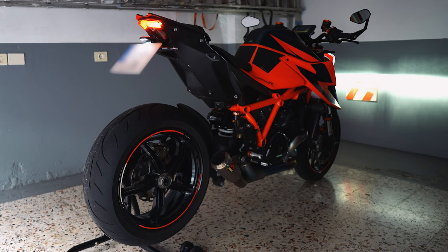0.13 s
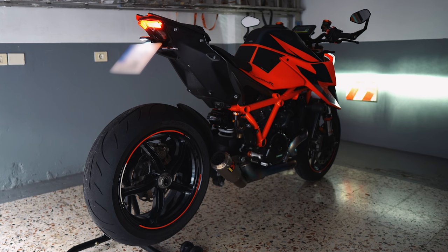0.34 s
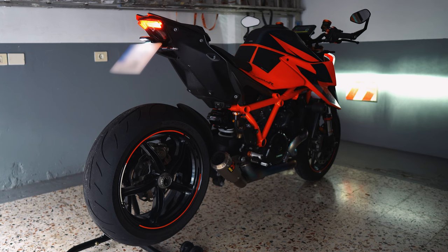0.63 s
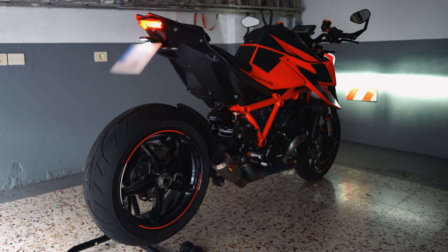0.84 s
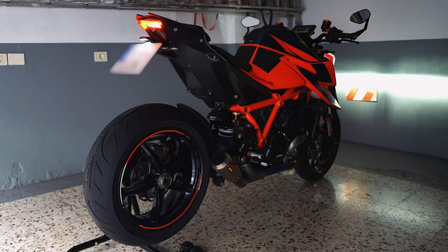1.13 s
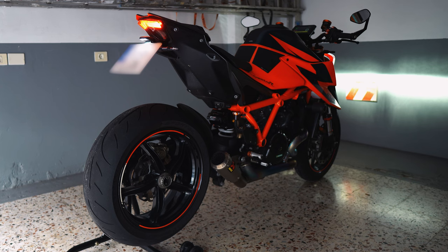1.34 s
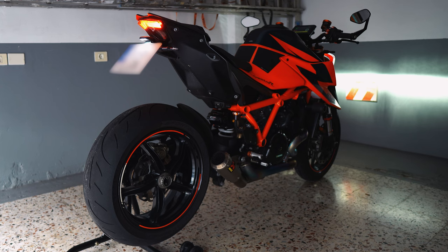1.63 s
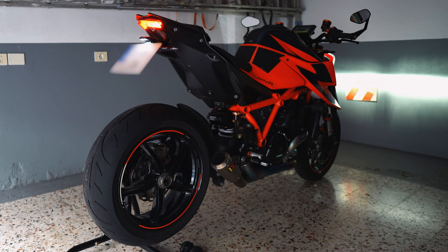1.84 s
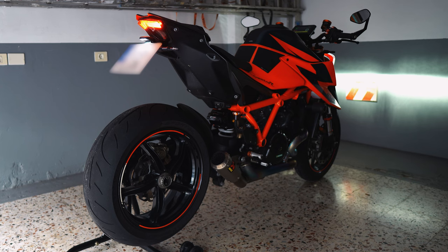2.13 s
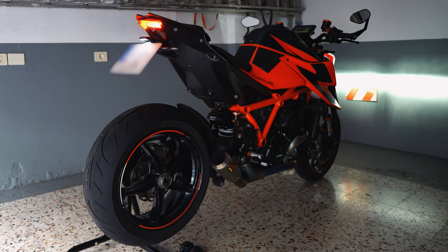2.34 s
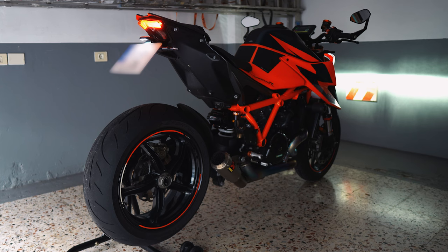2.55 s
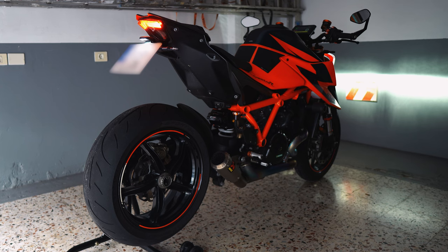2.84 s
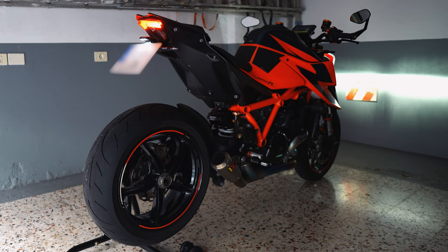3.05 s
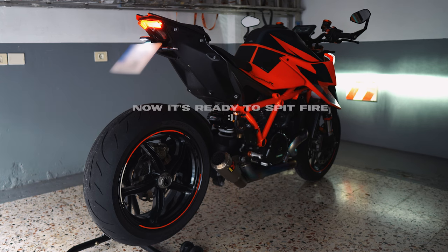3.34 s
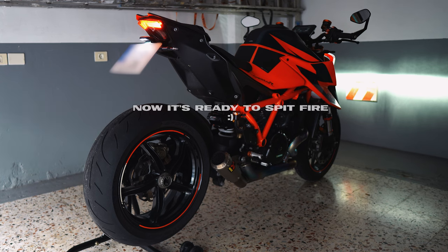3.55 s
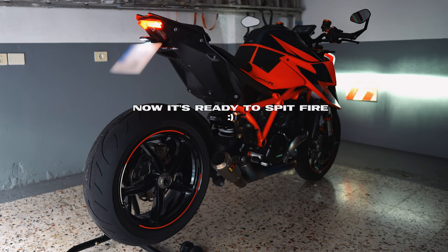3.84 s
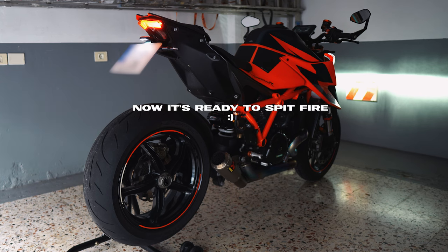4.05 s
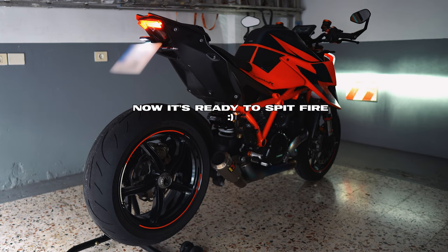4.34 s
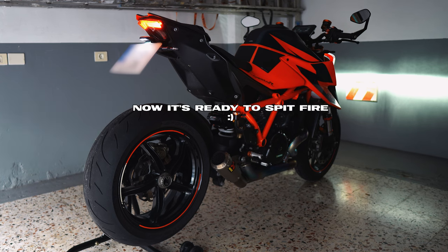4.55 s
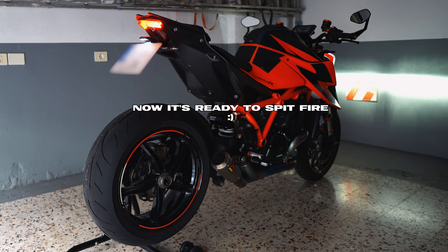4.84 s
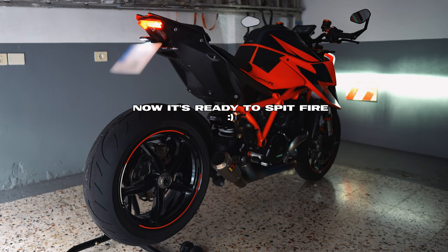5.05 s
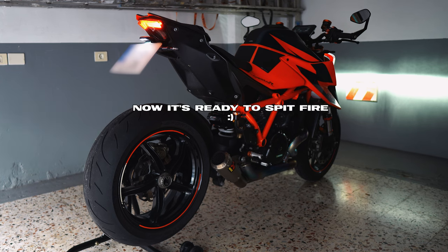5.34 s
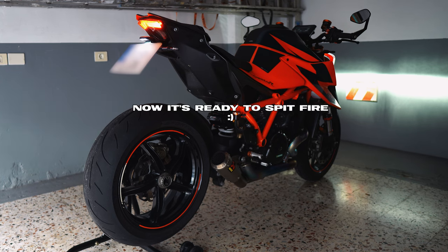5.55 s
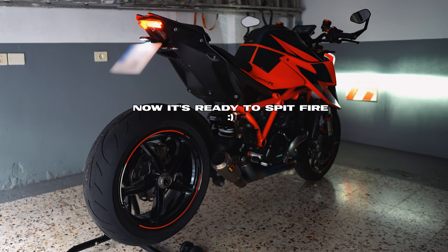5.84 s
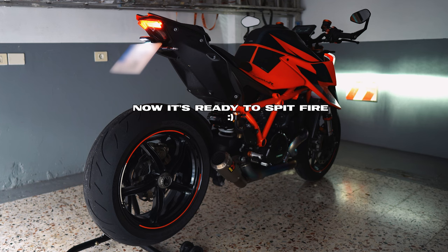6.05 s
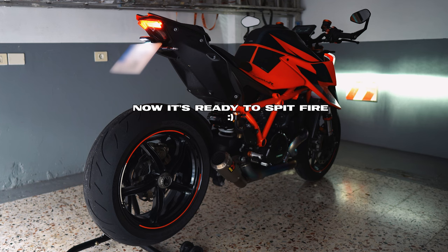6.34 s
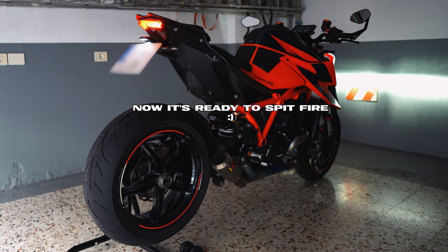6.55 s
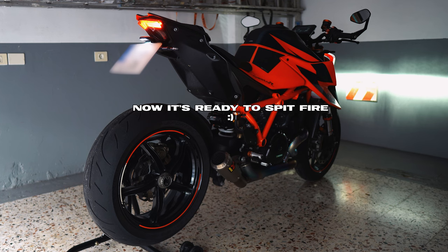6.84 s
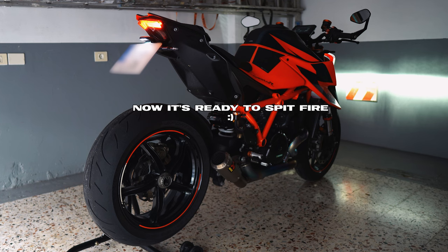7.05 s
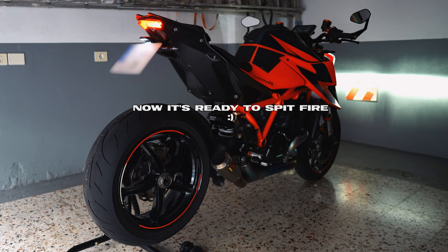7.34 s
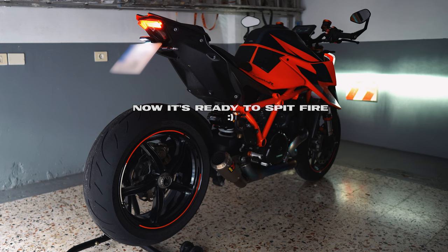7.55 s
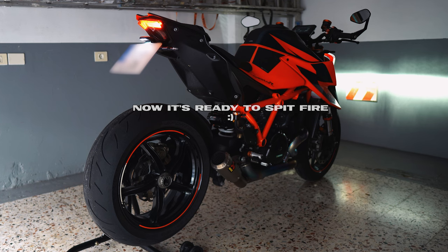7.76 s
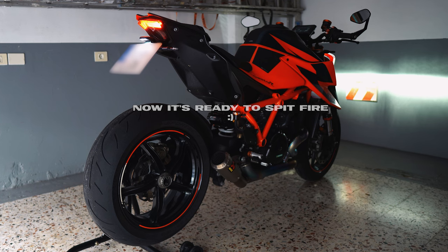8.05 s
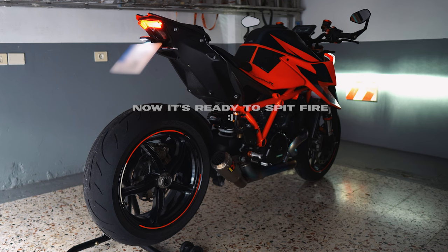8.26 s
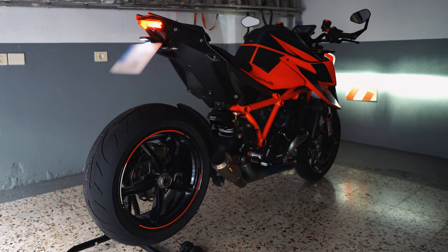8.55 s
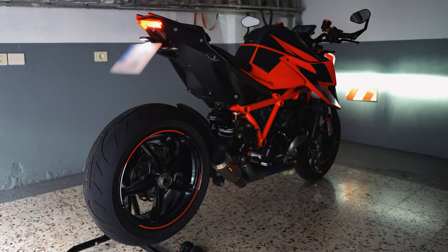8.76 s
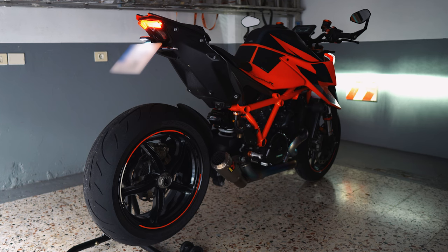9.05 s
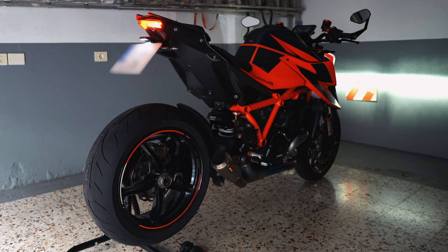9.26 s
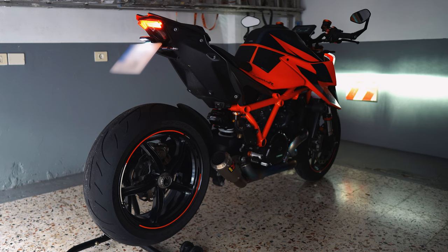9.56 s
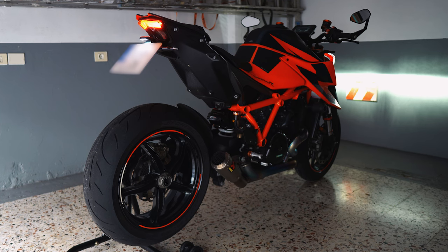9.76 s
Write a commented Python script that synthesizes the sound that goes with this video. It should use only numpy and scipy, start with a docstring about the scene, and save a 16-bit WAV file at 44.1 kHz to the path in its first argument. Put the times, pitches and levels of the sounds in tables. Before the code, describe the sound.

A big twin-cylinder motorcycle idles in a hard-walled garage, heard from nearby. It starts loud and fast, with a deep pulsing boom, a barking exhaust, sharp ticks and faint valve clatter. After about three seconds the sound changes abruptly to a quieter, slightly slower idle, which lopes unevenly with occasional weak beats until the end.

```python
"""A big V-twin motorcycle idles in a hard-walled garage. It opens on a fast, loud cold idle:
each firing pushes the air of pipe and room into low standing waves, then barks through the walls'
echoes and spits a sharp tick, while gas and gear hiss and valves clatter in time with the crank.
About 3.2 s in, a cut leads to the warm idle: slower, quieter and lumpy with weak firings to the end."""
import sys
import numpy as np
from scipy import signal
from scipy.fft import rfft, irfft, next_fast_len
from scipy.io import wavfile
from scipy.ndimage import uniform_filter1d

SR = 44100
rng = np.random.default_rng(int(sys.argv[2]) if len(sys.argv) > 2 else 0)


def generate_wav(signal):
    """Clip the signal to [-1, 1] and save it as 16-bit WAV at the path in sys.argv[1]."""
    frames = np.transpose(np.atleast_2d(signal))
    scaled = np.clip(frames, -1, 1) * 32767
    pcm = np.round(scaled).astype(np.int16)
    wavfile.write(sys.argv[1], SR, pcm)


N = 436572
LEAD = SR // 4  # samples of pre-roll, so the engine is already ringing at the start

# Casing modes, rung by ticks and valves. Each row: pitch in Hz, relative level in dB, t60 in seconds.
CASING_MODES = [(2050, -7.5, 0.11), (3240, -3, 0.025), (3440, -2.5, 0.025), (4000, 0, 0.017),
                (4420, -7.5, 0.023), (4780, -4.5, 0.018), (5140, -5, .02), (6700, -14, .015)]


def amp(db):
    return 10 ** (np.asarray(db) / 20)


def unit(x):
    return x / np.sqrt(np.mean(x ** 2) + 1e-20)


def along(points, hz):
    """Read a curve of (Hz, value) points on a log frequency axis."""
    knots, values = np.transpose(points)
    return np.interp(np.log(hz + 1), np.log(knots + 1), values)


def filtered(x, response):
    """Equalise x with a gain given as a function of Hz."""
    size = next_fast_len(x.shape[-1] + 8192)
    return irfft(rfft(x, size) * response(np.fft.rfftfreq(size, 1 / SR)), size)[..., :x.shape[-1]]


def train(times, sizes):
    """Impulses at the given seconds, pre-roll included."""
    return np.bincount(np.round(times * SR).astype(int) + LEAD, sizes, N + 2 * LEAD)[:N + LEAD]


def struck(pulses, response):
    """Trigger the response on every impulse and trim the pre-roll."""
    return signal.fftconvolve(np.atleast_2d(pulses), np.atleast_2d(response), axes=1)[:, LEAD:LEAD + N]


def spread(pair, spectrum, peaks=()):
    """Colour two unrelated signals and mix them to stereo, wider toward the treble; rms 1."""
    # Stereo width. Each row: frequency in Hz, left-right likeness from 0 to 1.
    likeness = [(60, 0.93), (180, 0.9), (550, 0.85), (1650, 0.74), (4970, 0.55), (15000, 0.35)]
    # Stereo balance. Each row: frequency in Hz, left minus right in dB.
    balance = [(60, -3.5), (150, -3.5), (380, -1), (950, -1.5), (2380, -3.0), (5980, -1.5), (15000, 1.5)]

    def mid_side_gains(hz):
        angle = np.arccos(np.clip(along(likeness, hz), 0, 1)) / 2
        peaks_db = sum(db / (1 + (2 * (hz - centre) / width) ** 2) for centre, width, db in peaks)
        return amp(along(spectrum, hz) + peaks_db) * [np.cos(angle), np.sin(angle)]

    mid, side = filtered(pair, mid_side_gains)
    stereo = np.array([mid + side, mid - side])
    return unit(filtered(stereo, lambda hz: amp(np.outer([.5, -.5], along(balance, hz)))))


def crank_firings(speed, cylinders, uneven):
    """Each cylinder fires once in two turns. Each row out: time in seconds, push, tick, ping in dB."""
    knots, rpm = np.transpose(speed)
    t = knots[0] + np.arange(round((knots[-1] - knots[0]) * SR) + SR // 50) / SR
    cycles = np.cumsum(np.interp(t, knots, rpm)) / (120 * SR)
    rows = np.tile(np.array(cylinders, float), (int(cycles[-1]) + 1, 1))
    place = rows[:, 0] + np.arange(len(rows)) // 2
    reached = place < cycles[-1]
    times = np.interp(place[reached], cycles, t)
    scatter_db = rng.standard_normal((len(times), 3)) * [0.72, 1.3, 2]  # push, tick, ping
    for when, push_db, tick_db in uneven:
        nearest = np.argmin(abs(times - when))
        times[nearest] = when
        scatter_db[nearest, :2] = push_db, tick_db
    scatter_db[:, 2] += 0.66 * scatter_db[:, 1]  # a harder tick pings louder
    return np.column_stack([times, rows[reached, 1:] + scatter_db])


def valve_clatter(firings, db):
    """Valves seat at set places in the cycle and ring the casing faintly, in an ever new mix of modes."""
    # Valves seating. Each row: place in the two-turn cycle from 0 to 1, relative level in dB.
    valves = [(.41, 1), (.48, -1.5), (.81, 1.5)]
    t = np.arange(SR // 8) / SR
    front = firings[::2, 0]
    place, valve_db = np.transpose(valves)
    times = (front[:-1, None] + np.outer(np.diff(front), place)).ravel()
    sizes = amp(np.tile(valve_db, len(front) - 1) + 1.5 * rng.standard_normal(len(times)))
    strengths = rng.standard_normal((len(times), len(CASING_MODES), 2)) * sizes[:, None, None]
    rings = 0
    for k, (hz, mode_db, t60) in enumerate(CASING_MODES):
        taps = [train(times, side) for side in strengths[:, k].T]
        rings += struck(taps, amp(mode_db - 60 * t / t60) * np.sin(2 * np.pi * hz * t))
    return amp(db) * unit(rings) * amp([[-1], [1]])  # a little to the right


def gas_hiss(firings, spectrum, whistles, db):
    """Gas flow and valve gear make a patchy noise that swells after each firing."""
    t = np.arange(SR // 8) / SR
    flow = struck(train(firings[:, 0], amp(firings[:, 1])), t / .012 * np.exp(-t / 0.026))
    throb = amp(unit(flow - flow.mean()))  # 1 dB rms
    bins = signal.stft(rng.standard_normal((2, N)), nperseg=256)[2]
    patches = uniform_filter1d(rng.standard_normal(bins.shape[1:]), size=4, axis=0)
    patches = uniform_filter1d(patches, size=4, axis=1)
    noise = signal.istft(bins * amp(1.2 * unit(patches)), nperseg=256)[1][:, :N]
    return amp(db) * spread(noise * throb, spectrum, whistles)


def exhaust_ticks(firings, spectrum, lag_s, rise_s, db, ring_db):
    """Each blow leaves the pipe with a sharp tick and a tail; the metal pings differently each time."""
    times, tick_db, ping_db = firings[:, 0] + lag_s, firings[:, 2], firings[:, 3]
    t = np.arange(SR // 4) / SR
    hits = train(times, amp(tick_db)) + train(times + .012, amp(tick_db - 17))  # direct and wall echo
    burst = (t / rise_s) * np.exp(1 - t / rise_s) + amp(-13 - 60 * t / 0.34)
    crack = spread(struck(hits, burst) * rng.standard_normal((2, N)), spectrum)
    strengths = 0.44 * rng.standard_normal((len(times), len(CASING_MODES), 2)) + [.9, .1]
    mixes = [.7, 0.31], [1, -0.24]  # left and right hear partly the same blend of modes
    pings = 0
    for k, (hz, mode_db, t60) in enumerate(CASING_MODES):
        blows = [train(times, amp(ping_db + mode_db) * (strengths[:, k] @ mix)) for mix in mixes]
        ring = amp(-60 * t / t60) * np.sin(2 * np.pi * hz * t) * (1 - np.exp(-t / 0.00028))
        pings += struck(blows, ring)
    return amp(db) * crack + amp(ring_db) * unit(pings)


def exhaust_bark(firings, spectrum, db, t60, puff_db):
    """The blow's midrange: dense wall echoes, the same every time, and a short turbulent puff."""
    t = np.arange(SR // 2) / SR
    blows = train(firings[:, 0] + 0.009055, amp(firings[:, 1]))
    decay = amp(-60 * t / t60) + 0.53 * amp(-60 * t / 0.033)
    echoes = unit(struck(blows, decay * rng.standard_normal((2, len(t)))))
    puffs = unit(struck(blows, amp(-60 * t / 0.13)) * rng.standard_normal((2, N)))
    return amp(db) * spread(echoes + amp(puff_db) * puffs, spectrum)


def exhaust_boom(firings, modes):
    """Each firing rings the standing waves; their overlap swells and cancels with the firing gaps."""
    # Left and right sit at different points of the waves. Each row: frequency in Hz, left lead in radians.
    phase_lead = [(60, -0.24), (125, 0.23), (165, 0.26), (213, 0.03), (240, -0.61), (283, -1.3),
                  (310, -0.48), (360, 0.22), (470, 0.15)]
    t = np.arange(SR // 2) / SR
    ring = 0
    for hz, db, t60, polarity, pan_db in modes:
        envelope = amp(db + pan_db * np.array([[.5], [-.5]]) - 60 * t / t60)
        ring += polarity * envelope * np.sin(2 * np.pi * hz * t)
    waves = struck(train(firings[:, 0], amp(firings[:, 1])), ring)
    return filtered(waves, lambda hz: np.exp(1j * np.outer([.5, -.5], along(phase_lead, hz))))


def cold_idle():
    """The cold engine hunts around 1650 rpm, loud and fairly even."""
    # Crank speed, starting on a front-cylinder firing. Each row: time in seconds, speed in rpm.
    speed = [(-0.0791, 1648.0), (0.0, 1600.4), (0.1, 1712.4), (0.19, 1636.7), (0.49, 1639.9),
             (0.57, 1677.7), (0.76, 1668.7), (0.92, 1592.1), (1.0, 1631.6), (1.1, 1734.1), (1.19, 1613.2),
             (1.39, 1640.2), (1.55, 1673.4), (1.64, 1588.0), (1.76, 1683.2), (1.84, 1647.2), (1.92, 1670.4),
             (2.08, 1614.7), (2.29, 1697.4), (2.68, 1591.0), (2.78, 1678.0), (2.86, 1678.8), (2.94, 1642.2),
             (3.15, 1662.3)]
    # Front, then rear cylinder. Each row: place in the cycle from 0 to 1, push, tick and ping in dB.
    cylinders = [(0, 1, -45.5, -37.5), (.4008, 0, -51.5, -43.5)]
    # Weak, late or strong firings. Each row: time in seconds, push and tick in dB over the usual.
    uneven = [(-0.0497, 3.5, -1), (0.0962, -0.5, -3), (0.2108, -2, -5), (0.2402, -0.5, 0),
              (0.5766, -1.5, 0.2), (0.7204, -1, -1), (0.7914, 0.8, -7.5), (0.8945, -2.5, -2),
              (0.9701, -1, 0.6), (1.0432, 2.5, 2), (1.1134, -0.5, 0.2), (1.6242, -2.0, -2), (2.28, 1, 2.5),
              (2.323, -2.5, -0.7), (2.3512, 0.5, -5), (2.5691, -1.5, -2), (2.6137, 1, 3), (2.6874, 0, 0.1),
              (2.7176, -2.0, -4), (2.791, 2.5, 1.3), (3.1234, 1.4, 3)]
    # Standing waves of pipe and garage. Each row: pitch in Hz, level in dB, t60 in seconds,
    # polarity, left minus right in dB.
    modes = [(40.3, -40.5, 0.53, 1, 0), (54.4, -31, 0.38, -1, -2), (68.2, -23.5, 0.32, -1, 0),
             (75, -27.5, 0.46, 1, -1.5), (102.1, -13, 0.17, 1, -2.5), (109.78, -17.5, 0.82, -1, -2.5),
             (124.19, -3.5, 0.82, -1, -2), (126.05, -4.5, 0.3, 1, -1.5), (156, -36, 0.97, 1, -7.5),
             (165.3, -32.5, 0.304, 1, -7), (189.4, -42.5, 1, 1, -2.5), (212.6, -29.5, 0.23, -1, 1.5),
             (221.2, -37, 1, 1, 4), (237.1, -29, 0.215, -1, 7.5), (254.5, -42, 0.94, 1, 0.5),
             (284.2, -10.5, 0.069, 1, -1.7), (289.7, -14, 0.17, -1, -3.5), (298.1, -31, 0.16, -1, -1.5),
             (325.9, -32.5, 0.287, -1, -3), (339.5, -42.5, 0.27, 1, -1), (369.6, -43.5, 0.93, 1, 0),
             (392, -54.5, 0.9, 1, -1), (406.2, -38.5, 0.28, -1, -3.3), (447, -65, 0.27, 1, -2),
             (527, -34.5, 0.077, -1, -1), (533.4, -35, 0.138, 1, -1), (577, -50, 0.29, -1, 2)]
    # Tone curves of bark, tick and hiss. Each row: frequency in Hz, relative level in dB.
    bark_eq = [(120, -36.5), (170, -13), (280, -7.5), (370, -0.5), (441, -9.5), (530, -17.5), (640, -20),
               (800, -23), (1200, -36), (2000, -91)]
    tick_eq = [(1500, -32.5), (2500, -3.5), (5000, 2), (6800, -6.5), (8000, -5.5), (10000, -6.5),
               (13000, -6.5), (16000, -11.5)]
    hiss_eq = [(290, -29.5), (500, 1.5), (530, 0), (595, -16.5), (640, -8.5), (750, -24.5), (1000, -17.5),
               (1160, -11.5), (1280, -17.5), (2130, -14.5), (2530, -20.5), (3380, -19.5), (3800, -23.5),
               (11900, -36.5), (15900, -42.5)]
    # Narrow resonances in the hiss. Each row: centre in Hz, width in Hz, boost in dB.
    whistles = [(1138, 30, 5.5), (1660, 40, 3.5), (2130, 100, 0.5), (3360, 150, 3)]
    firings = crank_firings(speed, cylinders, uneven)
    return (exhaust_boom(firings, modes)
            + exhaust_bark(firings, bark_eq, db=-38, t60=.5, puff_db=-10.5)
            + valve_clatter(firings, db=-62.5)
            + exhaust_ticks(firings, tick_eq, lag_s=.0108, rise_s=0.0012, db=-58, ring_db=-60)
            + gas_hiss(firings, hiss_eq, whistles, db=-41.5))


def warm_idle():
    """The warm engine lopes around 1500 rpm, quieter, with some firings almost missing."""
    # Crank speed. Each row: time in seconds, speed in rpm.
    speed = [(3.1156, 1508.0), (3.46, 1405.9), (3.55, 1462.9), (3.65, 1446.4), (3.76, 1516.9),
             (3.99, 1497.7), (4.33, 1478.4), (4.6, 1489.0), (4.73, 1535.0), (4.92, 1476.4), (5.02, 1531.6),
             (5.11, 1486.5), (5.26, 1530.8), (5.67, 1501.3), (5.76, 1460.6), (5.85, 1519.8), (5.93, 1488.5),
             (6.2, 1529.1), (6.33, 1561.9), (6.42, 1570.5), (6.57, 1506.2), (6.88, 1477.9), (6.96, 1533.9),
             (7.05, 1480.0), (7.26, 1464.9), (7.34, 1525.9), (7.43, 1503.0), (7.57, 1573.5), (7.97, 1518.1),
             (8.06, 1551.5), (8.16, 1515.3), (8.33, 1550.3), (8.5, 1576.3), (8.59, 1508.6), (8.88, 1522.0),
             (8.96, 1577.3), (9.05, 1455.5), (9.14, 1502.4), (9.34, 1480.7), (9.43, 1456.0), (9.77, 1476.6),
             (9.85, 1427.9)]
    # Front, then rear cylinder. Each row: place in the cycle from 0 to 1, push, tick and ping in dB.
    cylinders = [(0, -0.043, -64.5, -54.5), (0.3973, -.2, -59, -49)]
    # Stumbles and kicks. Each row: time in seconds, push and tick in dB over the usual.
    uneven = [(3.114, 1, -0.5), (3.1478, -1.5, -0.5), (3.2775, -4.5, -4.8), (3.361, -1.4, -2.6),
              (3.3929, -1.5, -8.5), (4.125, -0.5, -2.8), (4.287, -2, 1), (4.4161, -0.5, -4.5),
              (4.449, -1, 2), (4.5279, -1, -6.5), (4.5772, -2, -7), (4.6581, 1.5, 3.3),
              (4.6887, -1.2, -4.5), (4.7696, 0, 4), (4.8171, 2.5, 3), (4.8965, -13.5, -10.5),
              (4.9277, 0.8, 4.5), (5.0086, 2, 1.6), (5.0877, -0.7, 2.3), (5.1674, 1, -7.5),
              (5.214, -1.8, -10), (5.2465, 1.5, 2.1), (5.2942, 2.0, 2.2), (5.6107, 1.5, 2), (6.012, 2, 2.5),
              (6.0433, -2.0, -1.5), (6.0908, 2, -4.5), (6.3567, 2, 2), (6.4019, 0.5, -6), (6.5105, 2, -2),
              (6.5591, -13.5, -9.5), (6.7982, 3.1, 5), (6.832, -18.5, -14.5), (6.8787, -1, -4),
              (7.4418, 1.5, 2.3), (7.4822, -2, -8.5), (7.5527, 2.5, 1.9), (7.6281, 1, -5),
              (7.7513, -3.7, -8.5), (7.861, 2.5, 0.5), (7.9067, -5, -10), (7.987, 3, -0.7),
              (8.2988, -2, -9.5), (8.3784, 1.5, 0.5), (8.4081, -3.5, -8.5), (8.4849, 2, -1.5),
              (8.6398, -7, -12.5), (8.7681, 1.5, 0.5), (8.7985, -2.5, -6), (8.8458, 0.0, -10.2),
              (8.9256, 2.0, 3.8), (9.033, -8.5, -9), (9.1636, -0.5, -7), (9.2766, 2.3, -2.5),
              (9.3257, -9, -11), (9.438, -1.4, -8), (9.4846, -8, -10.5), (9.602, -1.2, -11),
              (9.6517, -0.8, -6.5), (9.7653, -1.7, -6.5), (9.8157, -4.5, 1.5)]
    # Standing waves, their balance shifted by hot gas. Each row: pitch in Hz, level in dB,
    # t60 in seconds, polarity, left minus right in dB.
    modes = [(42.8, -41, 0.97, 1, -3), (54.6, -36, 0.17, -1, -4.5), (67.2, -33.5, 0.28, -1, -1),
             (75, -35, 0.4, 1, -3), (99.9, -22, 0.15, 1, -2), (110.9, -29, 0.7, -1, -2.5),
             (124.59, -16.5, 0.52, -1, -2.5), (126.9, -19, 0.24, 1, -2), (152.9, -28.5, 0.83, 1, -4),
             (170, -42, 0.92, -1, -5.5), (196.3, -42, 0.3, -1, -2.5), (210, -42, 0.47, -1, 1.5),
             (233, -34, 0.22, -1, 2.5), (232, -27.5, 0.07, 1, 3), (248, -55, 0.17, -1, 0.5),
             (279, -43.5, 0.2, 1, 1.5), (291.6, -41.5, 0.27, -1, -3.5), (303.4, -39, 0.45, -1, -0.5),
             (312.8, -52.5, 0.46, -1, -3.5), (327.5, -34, 0.24, 1, -3.5), (344.6, -51, 0.93, -1, -2),
             (363, -33, 0.13, -1, 3), (364.4, -36.5, 0.36, 1, 2.5), (398, -49.5, 0.04, 1, 1),
             (453.6, -54.5, 0.26, -1, -3)]
    # Tone curves of bark, tick and hiss. Each row: frequency in Hz, relative level in dB.
    bark_eq = [(120, -43.5), (170, -9.5), (240, -22), (320, -11), (400, -16.5), (530, -28.5), (650, -33.5),
               (1200, -47), (2000, -89)]
    tick_eq = [(1500, -30), (2500, -3), (5000, 3.5), (6800, -10), (8500, -6), (10500, -5.5), (13000, -5),
               (16000, -11)]
    hiss_eq = [(290, -27), (500, 0), (595, -9), (658, -1), (729, -11.5), (1130, -6.5), (1260, -10.5),
               (1760, -8.5), (2040, -7), (2420, -16), (3190, -13), (5150, -20), (7390, -30), (12600, -38),
               (15900, -42.5)]
    # Narrow resonances in the hiss. Each row: centre in Hz, width in Hz, boost in dB.
    whistles = [(1610, 54, 1.5), (2070, 83, 2.6), (3160, 88, 1.7)]
    firings = crank_firings(speed, cylinders, uneven)
    return (exhaust_boom(firings, modes)
            + exhaust_bark(firings, bark_eq, db=-43.5, t60=0.57, puff_db=-8)
            + valve_clatter(firings, db=-72)
            + exhaust_ticks(firings, tick_eq, lag_s=.011, rise_s=0.0013, db=-66.5, ring_db=-66.5)
            + gas_hiss(firings, hiss_eq, whistles, db=-52))


def scene():
    """Cold idle up to the cut, warm idle after it."""
    cut_s, fade_s = 3.1915, .002
    warm_share = np.clip((np.arange(N) / SR - cut_s) / fade_s, 0, 1)
    return (1 - warm_share) * cold_idle() + warm_share * warm_idle()


def record(dry):
    """Peaks flatten at full scale, then a brick-wall low-pass takes off the very top."""
    return filtered(np.clip(dry, -1, 1), lambda hz: hz < 15830)


dry = scene()
out = record(dry)
generate_wav(out)
```